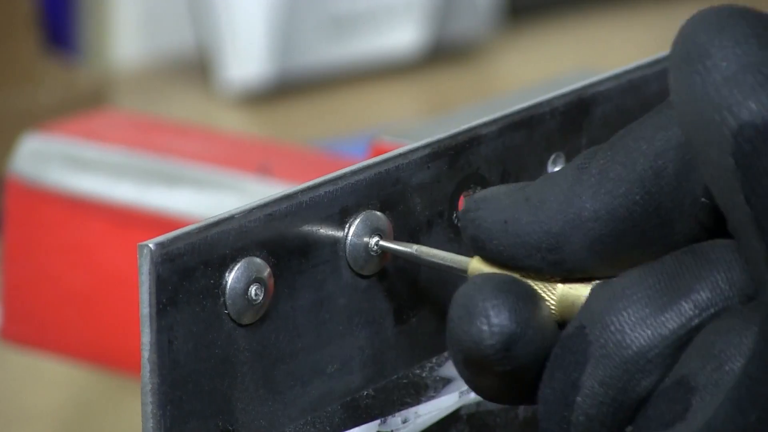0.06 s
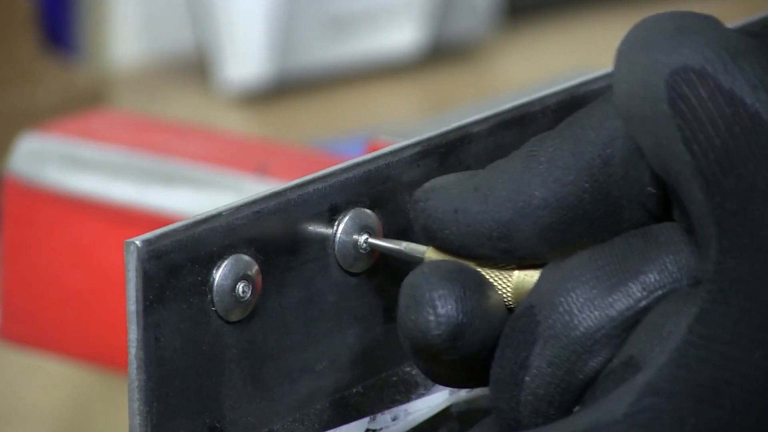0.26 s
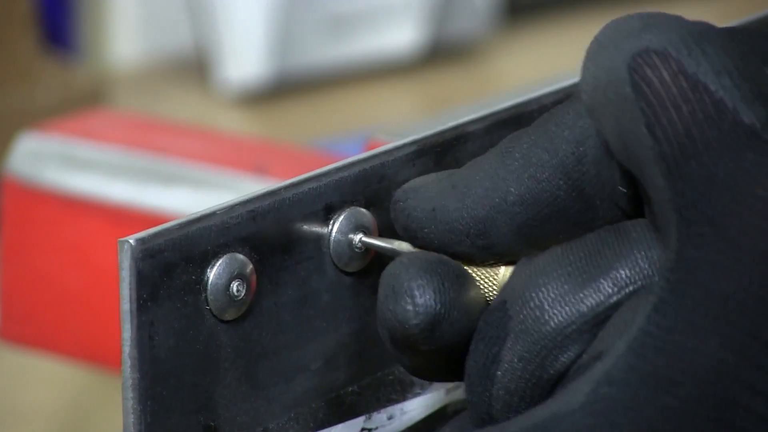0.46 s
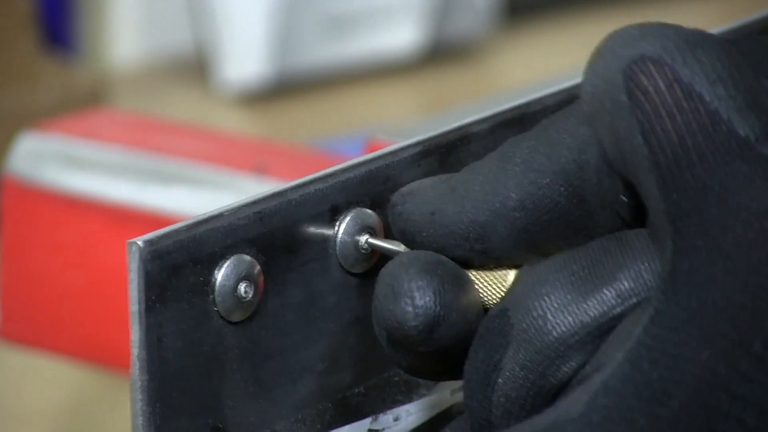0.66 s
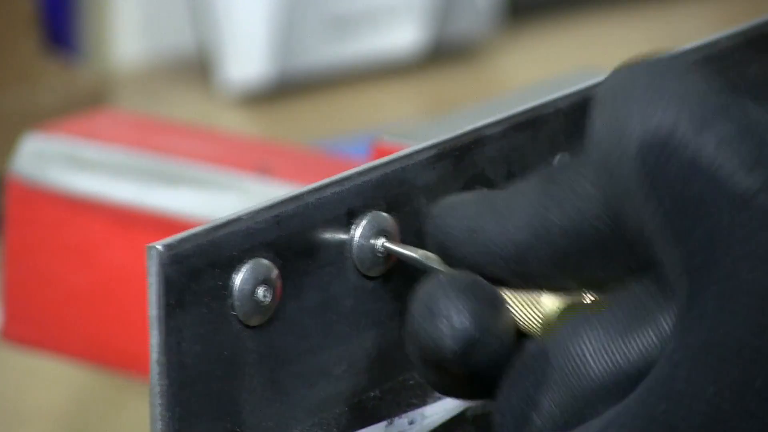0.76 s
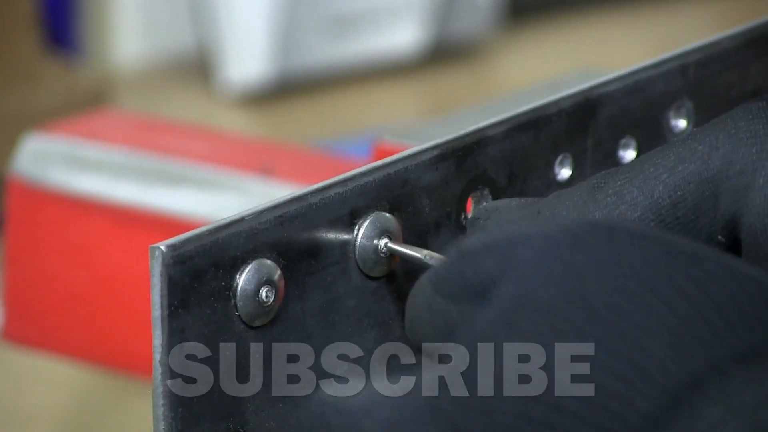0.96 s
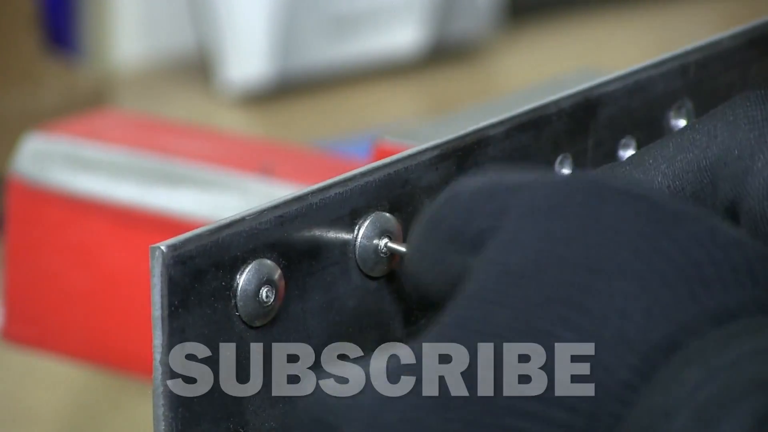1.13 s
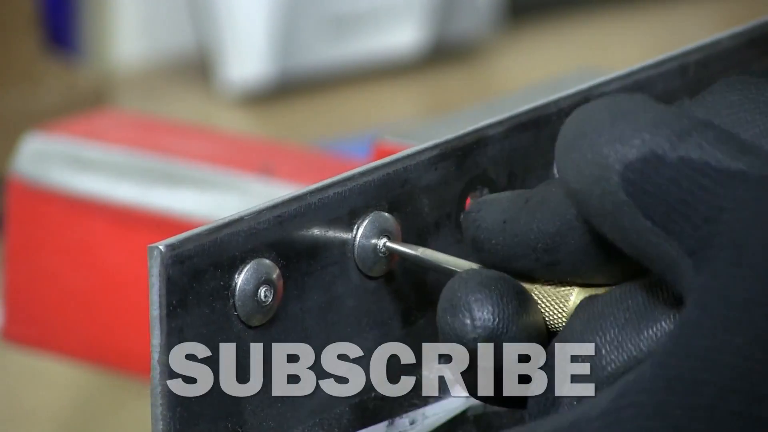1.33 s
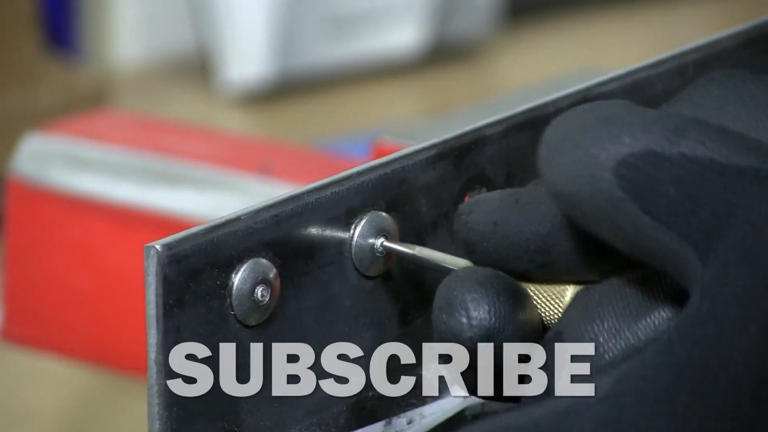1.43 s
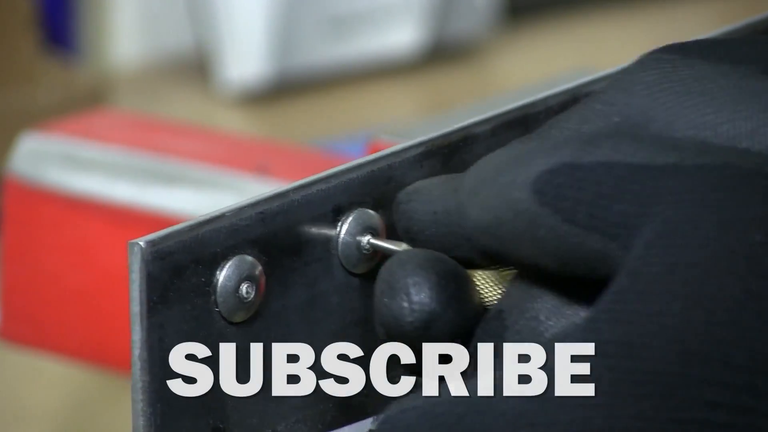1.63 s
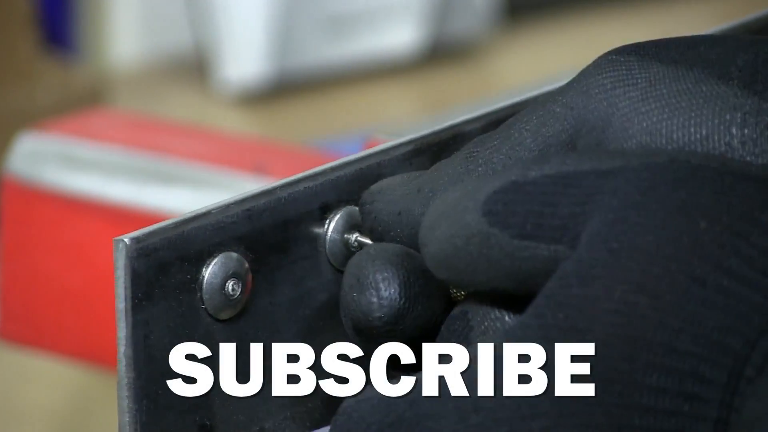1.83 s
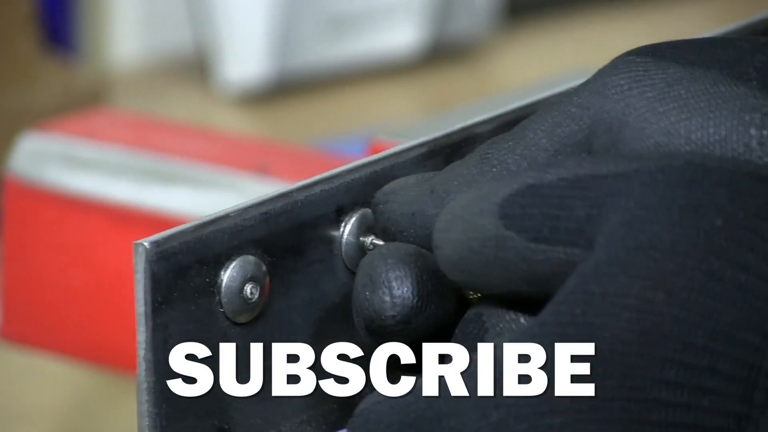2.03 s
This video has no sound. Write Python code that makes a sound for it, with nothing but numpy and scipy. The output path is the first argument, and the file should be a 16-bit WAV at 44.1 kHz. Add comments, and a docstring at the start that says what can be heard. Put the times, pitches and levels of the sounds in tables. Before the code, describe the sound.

Two sharp metallic snaps of a centre punch against a rivet, with faint ticks between.

```python
"""A spring-loaded centre punch snaps twice against a rivet in a steel plate, heard close up.
Each time its spring scrapes, then the hammer slips and lands: a sharp crack, a bright ring of
plate and punch, and a low thump as the plate rocks. In between, the mechanism resets with small
ticks and a rattle, and a rubber glove rubs and pops as the hand shifts its grip.
The workshop answers with a short tail over faint, steady air noise."""
import sys
import numpy as np
from scipy import signal
from scipy.fft import rfft, irfft, next_fast_len
from scipy.io import wavfile

SR = 44100
rng = np.random.default_rng(int(sys.argv[2]) if len(sys.argv) > 2 else 0)


def dump_mix(stems):
    """Bounce the given channels to the path in sys.argv[1] as a 16-bit WAV at rate SR."""
    frames = np.atleast_2d(stems).T  # one column per channel
    limited = np.clip(frames, -1, 1)  # hard clip at full scale
    pcm = np.round(limited * 32767).astype(np.int16)
    wavfile.write(sys.argv[1], SR, pcm)


N = 91816

# The modes of the punch alone. Each row: pitch in Hz, level in dB, t60 in seconds.
PUNCH_MODES = [(1642, -12, .16), (1850, -8, .11), (2800, -10, .11), (3456, -7, .13), (3780, -11, .07),
               (4479, -6, .14), (5100, -13, .08), (5792, -10, .1), (6100, -6, .07), (6770, -11, .14),
               (7040, -11, .14), (14160, -21, .07)]
RISE_S, PING_T60_S = 0.005, 0.092


def hammer_snaps():
    """The hammer slips and lands, ringing plate and punch. Returns the close sound and the room send."""
    # Each row: start in seconds, then the levels of ring, crack, clang and thump in dB.
    blows = [(.4312, -2, -16.5, -28, -29), (1.7985, -1.5, -14.5, -25, -25)]
    # The clear ringing tones of plate and punch, with one faint, lingering room tone at 945 Hz.
    # Each row: pitch in Hz, level in dB at the first snap and at the second, t60 in seconds.
    ring_tones = [(337, -39, -38, 0.42), (898, -43, -39, 0.55), (945, -51, -45, 0.7),
                  (1012, -31, -29.5, 0.21), (1222, -40, -39, 0.3), (1701, -29, -36, 0.19),
                  (1722, -35, -43, 0.3), (1820, -27, -37, 0.16), (1922, -37, -39, 0.26),
                  (2078, -33, -37, 0.25), (2900, -35, -39, 0.13), (3633, -32, -47, 0.13),
                  (3914, -22, -25, 0.095), (4508, -21, -30, 0.1), (4688, -21, -22, 0.11),
                  (4796, -25, -33, 0.08), (5139, -33, -29, 0.12), (5384, -31, -24.5, 0.14),
                  (5816, -27, -28, 0.12), (5936, -24, -27, 0.17), (6028, -26, -24, 0.13),
                  (6360, -26, -23, 0.135), (6567, -42, -31, 0.17), (6752, -33, -20, 0.14),
                  (7040, -23, -18, 0.11), (7177, -27, -22, 0.09), (7498, -40, -23, 0.14),
                  (7601, -36, -27, 0.16), (8166, -41, -38, 0.29), (8488, -39, -30, 0.12),
                  (8764, -46, -35, 0.25), (9318, -55, -38, 0.33), (9927, -38, -21, 0.125),
                  (10560, -44, -34, 0.16), (11250, -58, -44, 0.28), (11810, -58, -45, 0.29),
                  (12060, -43, -36, 0.16), (12640, -63, -50, 0.25), (13400, -54, -54, 0.24),
                  (14250, -49, -58, 0.12)]
    # The spectra of crack and dense clang, one per snap. Each point: frequency in Hz, level in dB.
    crack_colours = [
        [(53, -47.5), (90, -13), (290, -8), (440, -18.5), (540, -5.5), (700, -5.5), (1250, -22), (1720, -10),
         (3900, -3.5), (4260, -7.5), (7000, -13.5), (15500, -32)],
        [(53, -50), (90, 7), (330, 5), (590, -7.5), (830, 4.5), (2300, -2.5), (3150, 6), (5280, -3), (8500, -2),
         (11000, -8.5), (15500, -34)],
    ]
    clang_colours = [
        [(400, -28.5), (1300, -12), (1800, 0.5), (2400, -16.5), (3100, -9), (6300, -15), (9000, -15.5),
         (9700, -27.5), (15500, -27)],
        [(550, -45), (850, -1), (1600, -17), (2500, -8.5), (4500, -1), (9000, -9.5), (12000, -15.5),
         (15500, -30)],
    ]
    release_lead_s, release_db = 0.0022, -9.5  # the hammer slips off just before it lands
    wash_db, modes_send_db = 3.5, -5.5  # the room takes the whole clang; clear modes stand out close up
    close, send = np.zeros(N), np.zeros(N)
    for k, (s, ring_db, crack_db, clang_db, thump_db) in enumerate(blows):
        t = since(s)
        release = amp(release_db) * strike(since(s - release_lead_s), 0.0015, t60=0.03)
        crack = amp(crack_db) * noise(crack_colours[k]) * (release + strike(t, RISE_S, t60=0.041))
        clang_decay = strike(t, RISE_S, t60=0.2)
        clang = amp(clang_db) * crowded_modes(clang_colours[k]) * clang_decay
        modes = amp(ring_db) * ring(t, [(hz, dbs[k], t60) for hz, *dbs, t60 in ring_tones], RISE_S)
        wash = amp(clang_db + wash_db) * noise(clang_colours[k]) * clang_decay
        close += crack + clang + modes + amp(thump_db) * plate_thump(s)
        send += crack + wash + amp(modes_send_db) * modes
    return close, send


def crowded_modes(colour):
    """The plate's many weak modes: steady partials at random pitches, crowding low down, at rms 1."""
    modes_per_khz, dense_below_hz = 26.38, 3800

    def pick(hz):
        crowding = 1 + (dense_below_hz / (hz + 1)) ** 4
        share = np.clip(modes_per_khz * hz[1] / 1000 * crowding, 1e-4, 1)
        return (rng.random(len(hz)) < share) / np.sqrt(share)
    return unit(filtered(noise(colour), pick))


def plate_thump(s):
    """The recoil rocks the plate in its mount: one push that swings back and dies."""
    # The rocking modes. Each row: pitch in Hz, level in dB, t60 in seconds.
    rocking = [(44.5, -3.5, 0.12), (68.4, -1, 0.046)]
    t = since(s)
    return sum(amp(db - 60 * t / t60) * np.sin(2 * np.pi * hz * t) for hz, db, t60 in rocking)


def mechanism_ticks():
    """Small contacts inside the punch: a click, the punch's ring, a ping of the struck part, a thump."""
    # Each row: start in seconds, level in dB, tilt in dB per octave, thump level in dB,
    # ping pitch in Hz, ping level in dB, ping width in octaves.
    contacts = [(0.8762, -47, -2, -49, 6350, -56, 0.22), (1.2115, -53, 1.5, -58, 14220, -61, 0.071),
                (1.431, -58, -10, -74, 1440, -55.5, 0.59), (1.709, -65, -6.5, -57.5, 4950, -64, 0.67)]
    # The click's spectrum before the tilt. Each point: frequency in Hz, level in dB.
    click_colour = [(410, -78), (980, -3.5), (2490, -30), (2800, 1.5), (6500, 6.5), (8000, -3.5),
                    (15500, -20)]
    ring_db = -5
    out = np.zeros(N)
    for s, db, tilt_db, thump_db, ping_hz, ping_db, ping_width in contacts:
        t = since(s)
        tilted = [(hz, level + tilt_db * np.log2(hz / 4500), t60) for hz, level, t60 in PUNCH_MODES]
        modes = amp(ring_db) * ring(t, tilted, rise_s=0.0012)
        click = noise(click_colour, tilt_db) * strike(t, 0.0029, t60=0.074)
        ping = band(rng.standard_normal(N), ping_hz, ping_width) * strike(t, 0.0014, PING_T60_S)
        out += amp(db) * (click + modes) + amp(ping_db) * ping + amp(thump_db) * plate_thump(s)
    return out


def spring_scrapes():
    """The spring scrapes in the barrel: tiny slips ring the punch and squeak at one pitch a stroke."""
    # Each row: start in seconds, length in seconds, level in dB, squeak pitch in Hz.
    strokes = [(0.144, 0.13, -66.5, 4510), (0.193, 0.023, -58, 3390), (0.27, 0.046, -55, 4400),
               (0.292, 0.018, -59, 5920), (0.321, 0.023, -61.5, 4100), (0.839, 0.097, -64.5, 4750),
               (1.55, 0.15, -70, 3410), (1.626, 0.032, -64, 5180), (1.663, 0.074, -63, 5706),
               (1.77, 0.02, -65, 6350)]
    # The spectrum of the grit. Each point: frequency in Hz, level in dB.
    grit_colour = [(530, -48.5), (1660, 0.5), (2510, -13), (2900, -0.5), (5450, -3.5), (7500, -20),
                   (15000, -25)]
    ring_db, squeak_db, squeak_t60_per_length = -6, -0.5, 2.7
    drive, squeaks = np.zeros(N), np.zeros(N)
    for s, length, db, hz in strokes:
        stroke = amp(db) * swell(s, length) * unit(slips(per_s=1000))
        drive += stroke
        squeaks += resonate(stroke, [(hz, 0, squeak_t60_per_length * length)])
    grit = filtered(drive, lambda hz: unit(amp(along(grit_colour, hz))))
    pressed = [(hz, db, t60 * 0.5) for hz, db, t60 in PUNCH_MODES]  # pressing on the rivet damps it
    return grit + amp(ring_db) * resonate(grit, pressed) + amp(squeak_db) * squeaks


def spring_rattle():
    """Once the punch has reset, its loose spring rattles three times, ever weaker."""
    start_s, gap_s, first_db, loss_db = 0.909, 0.022, -64, 6
    shakes = sum(amp(first_db - k * loss_db) * strike(since(start_s + k * gap_s), RISE_S, PING_T60_S)
                 for k in range(3))
    return shakes * band(rng.standard_normal(N), centre_hz=6200, width_oct=0.25)


def glove():
    """Rubber rubs on the handle in grainy strokes and pops where it comes unstuck."""
    # Each row: start in seconds, length in seconds, level in dB, band centre in Hz.
    rubs = [(0.345, 0.08, -54.5, 177), (0.588, 0.23, -58.5, 560), (0.68, 0.069, -53.5, 318),
            (0.786, 0.21, -63, 1160), (1.269, 0.063, -61, 429), (1.261, 0.13, -73, 2610),
            (2.05, 0.09, -61.5, 390)]
    # From tiny crackles to dull plops. Each row: start in seconds, level in dB, band centre in Hz.
    pops = [(.042, -70.5, 9500), (0.133, -63, 9300), (0.146, -64.5, 10100), (0.153, -67, 10100),
            (.369, -48, 220.7), (.632, -43, 475.5), (1.503, -66, 8780), (1.578, -66, 10860)]
    out = np.zeros(N)
    for s, length, db, hz in rubs:
        out += amp(db) * swell(s, length) * band(slips(per_s=780), hz, width_oct=0.77)
    for s, db, hz in pops:
        burst = strike(since(s), 0.001, t60=0.011)
        out += amp(db) * burst * band(rng.standard_normal(N), hz, width_oct=0.45)
    return out


def workshop_reverb(send):
    """The room's tail, thin in the bass this close up; each frequency dies at its own speed."""
    # The room's decay. Each point: frequency in Hz, t60 in seconds.
    decay_times = [(100, .35), (500, 1), (2000, 0.7), (4500, 0.61), (9000, 0.5), (15000, 0.64)]
    build_s, low_cut_hz = 0.0017, 494
    hz, t, spectrum = signal.stft(rng.standard_normal(SR * 3 // 4), SR, nperseg=256)
    decay = amp(-60 * t / along(decay_times, hz)[:, None])
    tail = signal.istft(spectrum * decay, SR, nperseg=256)[1]
    tail *= 1 - np.exp(-np.arange(len(tail)) / SR / build_s)
    wet = signal.fftconvolve(send, tail / np.linalg.norm(tail))[:N]
    return filtered(wet, lambda f: f ** 2 / (f ** 2 + low_cut_hz ** 2))


def room_air():
    """The workshop's steady air noise, mostly a low rumble."""
    # Each point: frequency in Hz, level in dB.
    air_colour = [(15, -39.5), (25, -7), (209, -3), (270, -11.5), (345, -5), (552, -13.5), (1700, -20),
                  (2700, -33), (4260, -32.5), (15500, -43.5)]
    return noise(air_colour)


def amp(db):
    """Decibels to gain."""
    return 10 ** (np.asarray(db) / 20)


def unit(x):
    """Scale to rms 1."""
    return x / np.sqrt(np.mean(x ** 2) + 1e-20)


def along(points, hz):
    """Read a curve of (Hz, value) points on a log frequency axis."""
    f, v = np.transpose(points)
    return np.interp(np.log(hz + 1), np.log(f + 1), v)


def filtered(x, response):
    """Shape x with a gain that depends on frequency."""
    size = next_fast_len(N + SR // 2)
    return irfft(rfft(x, size) * response(np.fft.rfftfreq(size, 1 / SR)), size)[:N]


def band(x, centre_hz, width_oct):
    """One band of x, at rms 1."""
    return unit(filtered(x, lambda hz: 1 / (1 + (np.log2((hz + 1) / centre_hz) / width_oct) ** 4)))


def noise(colour, tilt_db=0):
    """Coloured noise at rms 1, tilted by tilt_db per octave."""
    white = rng.standard_normal(N)
    return unit(filtered(white, lambda hz: amp(along(colour, hz) + tilt_db * np.log2(hz + 1))))


def slips(per_s):
    """Random stick-slip impulses."""
    return (rng.random(N) < per_s / SR) * rng.standard_normal(N)


def since(s):
    """Seconds since s, zero before it."""
    return np.maximum(np.arange(N) / SR - s, 0)


def strike(t, rise_s, t60):
    """A smooth attack, then a decay of 60 dB in t60 seconds."""
    attack = np.sin(np.pi / 2 * np.minimum(t / rise_s, 1)) ** 2
    return attack * amp(-60 * np.maximum(t - rise_s, 0) / t60)


def swell(s, length):
    """The rounded envelope of one stroke, quicker to rise than to fall."""
    return np.sin(np.pi * np.minimum(since(s) / length, 1) ** 0.8)


def ring(t, modes, rise_s):
    """Decaying sines at random phases, from (Hz, dB, t60) rows."""
    return sum(amp(db) * strike(t, rise_s, t60) * np.sin(2 * np.pi * (hz * t + rng.random()))
               for hz, db, t60 in modes)


def resonate(drive, modes):
    """A drive signal sounding through modes, at about its own level."""
    body = ring(since(0)[:SR // 4], modes, rise_s=0.0023)
    return signal.fftconvolve(drive, body / np.linalg.norm(body))[:N]


def scene():
    """Snaps and handling in the workshop, alike in both channels."""
    reverb_db, air_db = -18, -61
    snaps, snap_send = hammer_snaps()
    handling = mechanism_ticks() + spring_rattle() + spring_scrapes() + glove()
    reverb = amp(reverb_db) * workshop_reverb(snap_send + handling)
    mono = snaps + handling + reverb + amp(air_db) * room_air()
    return np.array([mono, mono])


def record(dry):
    """Soft overload rounds off the highest peaks, and a band limit cuts the top treble."""
    ceiling_db, top_hz, edge_hz = -7, 15850, 400
    rounded = dry / (1 + (dry / amp(ceiling_db)) ** 4) ** (1 / 4)
    return np.array([filtered(x, lambda hz: np.clip((top_hz - hz) / edge_hz + 0.5, 0, 1))
                     for x in rounded])


dry = scene()
out = record(dry)
dump_mix(out)
```